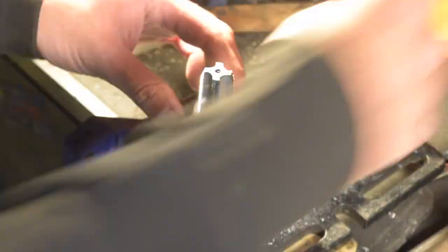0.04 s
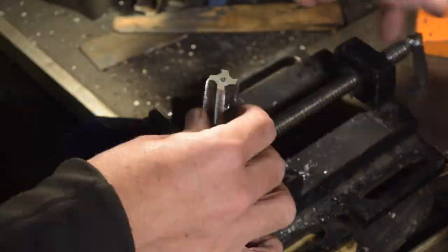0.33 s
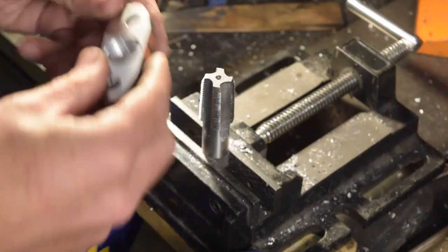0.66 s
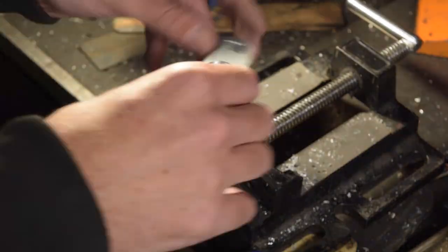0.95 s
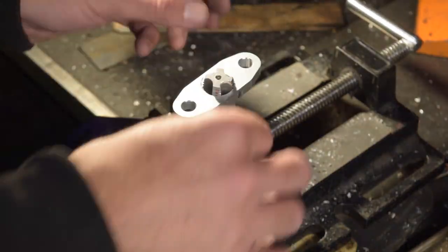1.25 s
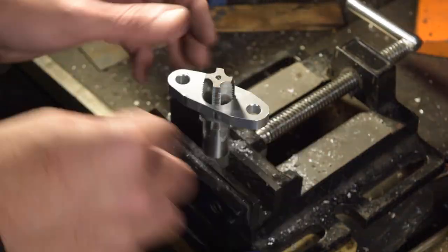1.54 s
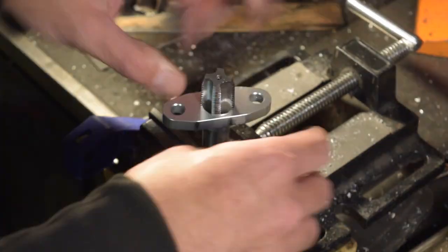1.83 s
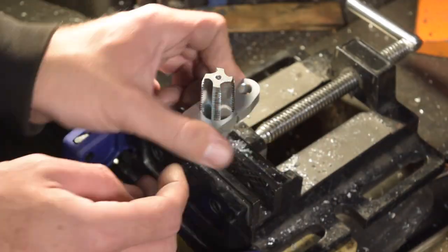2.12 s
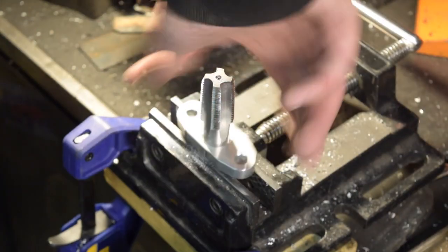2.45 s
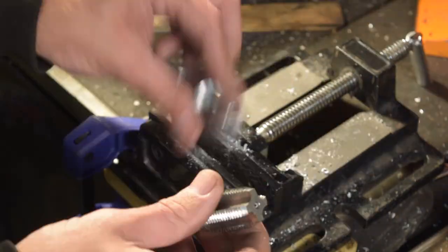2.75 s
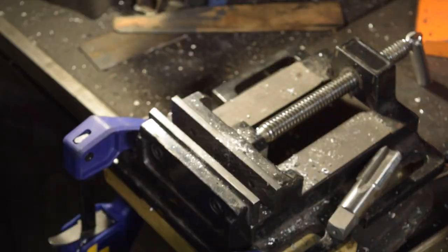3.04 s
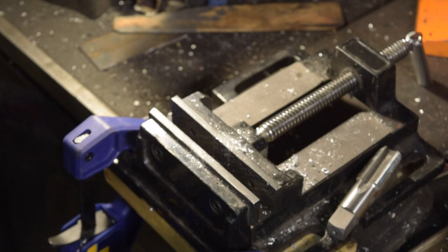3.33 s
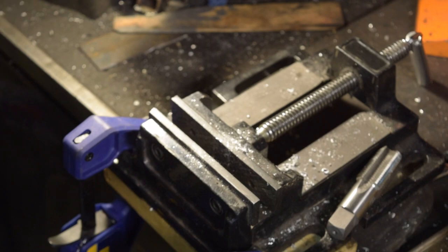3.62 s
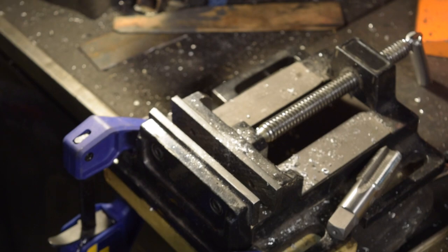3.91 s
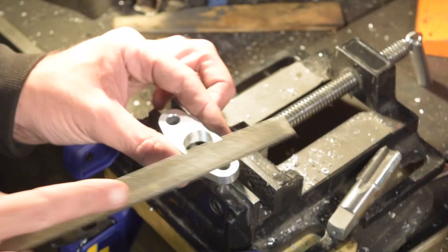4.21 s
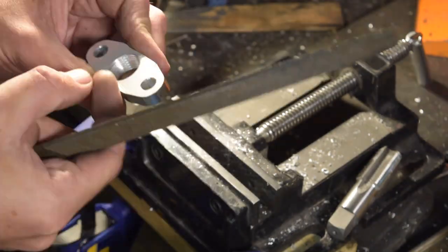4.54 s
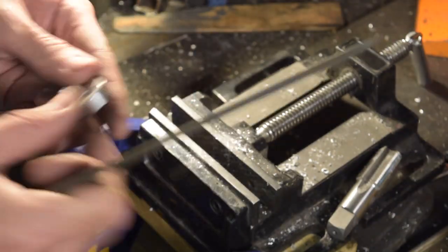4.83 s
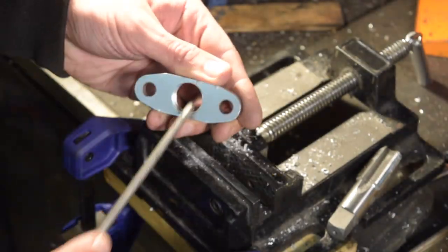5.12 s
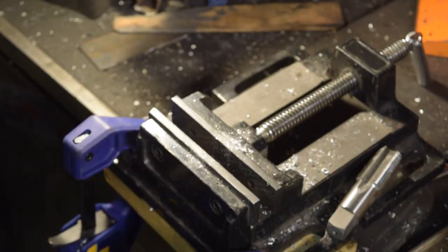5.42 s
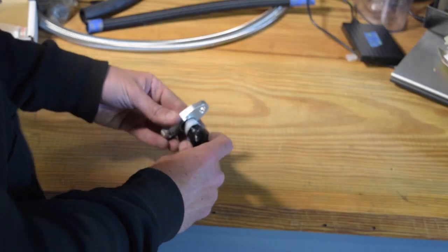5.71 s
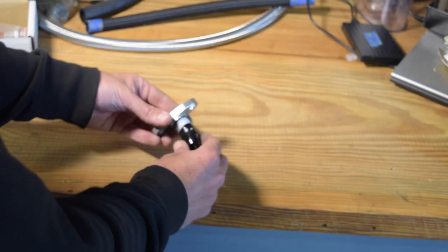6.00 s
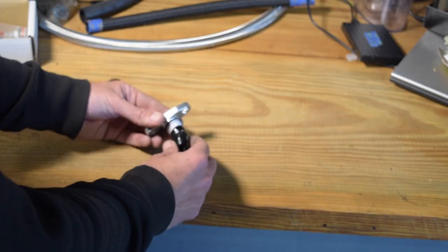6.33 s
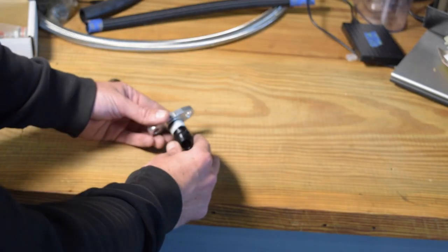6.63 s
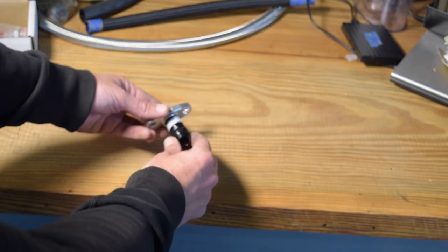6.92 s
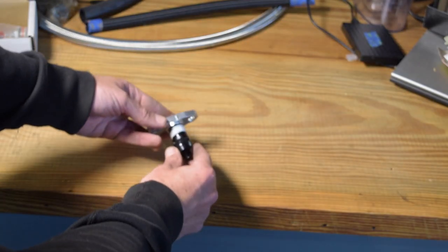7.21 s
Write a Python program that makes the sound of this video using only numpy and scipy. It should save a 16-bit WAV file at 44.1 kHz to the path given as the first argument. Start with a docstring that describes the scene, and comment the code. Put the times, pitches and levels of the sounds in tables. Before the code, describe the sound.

Sped-up metalwork sounds close and straight ahead in a quiet workshop, each contact very short and abruptly cut, over low room rumble and faint hiss. In the first second a vise gives a few dull metal knocks between light hand rubs. From 1 to about 2.5 seconds a metal flange clicks, rattles and scrapes around a threading tap, with thin, high pings, loudest near 1.3 seconds. More vise knocks follow, then a sharp steel clack at 2.8 seconds and two knocks by 3.1. In the lull a sleeve swishes softly, around 3.8 seconds. From 4.2 to 5 seconds a file gives several quick, ringing rasps. Tools clack at 5 seconds and bounce in a tiny clatter, followed by a light clink. From 5.8 to about 7.3 seconds come faint, separate scrapes of a fitting being twisted on.

```python
"""A metal flange is spun down a tap held in a vise, unclamped, filed and screwed to a pipe fitting.
The bench stands in a quiet workshop, close and straight ahead of the microphone. Each contact is a blow
and a chatter of slips that ring the touched metal; the work runs in time-lapse, so most sounds last a
few hundredths of a second and stop abruptly. A sleeve swishes once, over room rumble and faint hiss."""
import sys
import numpy as np
from scipy import signal
from scipy.fft import rfft, irfft
from scipy.io import wavfile

SR = 44100
rng = np.random.default_rng(int(sys.argv[2]) if len(sys.argv) > 2 else 0)


def dump_mix(stems):
    """Bounce the given channels to the path in sys.argv[1] as a 16-bit WAV at rate SR."""
    frames = np.atleast_2d(stems).T  # one column per channel
    limited = np.clip(frames, -1, 1)  # hard clip at full scale
    pcm = np.round(limited * 32767).astype(np.int16)
    wavfile.write(sys.argv[1], SR, pcm)


N = 320166
TIME = np.arange(N) / SR


def undb(db):
    """Decibels to gain."""
    return 10 ** (np.asarray(db) / 20)


def at_level(sound, db):
    """Scale to an rms level."""
    return sound * undb(db) / np.sqrt(np.mean(sound ** 2))


def colour_db(hz, colour):
    """Join (pitch_hz, level_db) points on a logarithmic frequency axis."""
    points_hz, points_db = np.transpose(colour)
    return np.interp(np.log(hz + 1), np.log(points_hz), points_db)


def noise(colour, db):
    """Steady noise of a given colour and rms level."""
    hz = np.arange(N // 2 + 1) * SR / N
    spectrum = rfft(rng.standard_normal(N)) * undb(colour_db(hz, colour))
    return at_level(irfft(spectrum, N), db)


def wander(rate_hz, count):
    """Random values at a steady rate, joined by straight lines."""
    return np.interp(TIME * rate_hz, np.arange(count), rng.standard_normal(count))


def ring(colour, modes, thud_db, edge_db, size, thud_hz=601, edge_hz=4510):
    """Impulse response of a part: a heavy push adds bass (thud), a sharp edge adds treble."""
    hz = np.arange(size // 2 + 1) * SR / size
    resonance = 1 + sum(undb(boost_db) ** 2 / (1 + (2 * (hz - pitch_hz) / width_hz) ** 2)
                        for pitch_hz, width_hz, boost_db in modes)
    bass_db = thud_db / (1 + (hz / thud_hz) ** 2)
    treble_db = edge_db * hz ** 3 / (hz ** 3 + edge_hz ** 3)
    magnitude = undb(colour_db(hz, colour) + bass_db + treble_db) * np.sqrt(resonance)
    cepstrum = irfft(np.log(magnitude))
    # folding the cepstrum puts all the ringing after the blow
    cepstrum[1:size // 2] *= 2
    cepstrum[size // 2 + 1:] = 0
    return irfft(np.exp(rfft(cepstrum)))


def contacts(rows, colour, modes, blow, grit_db, slip_hz, slip_db, stop_s, spot_db=2.5, size=8192):
    """Each contact is a first blow, then uneven slips over tiny ridges; its ring is cut short."""
    out, t = np.zeros(N + size), TIME[:size]
    for start, length, db, crest, fall_db, thud_db, edge_db in rows:
        ridges = rng.standard_normal(size) * undb(grit_db * rng.exponential(size=size))
        slips = undb(slip_db * np.interp(t * slip_hz, np.arange(size), rng.standard_normal(size)))
        # crest is a share of the length; fall_db is the drop over one whole length
        pressure = undb(-fall_db * np.abs(t / length - crest)) * (t < length)
        force = ridges * slips * pressure
        # a contact that starts under full pressure lands hard; one that swells lands softly
        force[0] += blow * pressure[0] * np.linalg.norm(force)
        # every contact touches another spot, which favours other modes
        favoured = [(hz, width, boost + spot_db * rng.standard_normal()) for hz, width, boost in modes]
        sound = signal.fftconvolve(force, ring(colour, favoured, thud_db, edge_db, size))[:size]
        sound *= np.exp(-np.maximum(t - length, 0) / stop_s)
        first = int(start * SR)
        out[first:first + size] += at_level(sound, db) * np.sqrt(length * SR / size)
    return out[:N]


def scrapes(table, fall_db, thud_db, edge_db, typical_db=-30):
    """Contact rows for a hand of even weight: a soft scrape is mostly thud, a hard one is sharper."""
    rows = []
    for start, length, db, crest in table:
        excess_db = db - typical_db
        thud, edge = thud_db - 0.54 * excess_db, edge_db + 0.06 * excess_db
        rows.append((start, length, db, crest, fall_db, thud, edge))
    return rows


def strokes(table, crest, fall_db, thud_db, edge_db):
    """Scrapes that all crest at the same share of their length."""
    return scrapes([(*row, crest) for row in table], fall_db, thud_db, edge_db)


def blows(table, crest, fall_db):
    """Contact rows that crest and fade alike, each with its own thud and edge."""
    return [(start, length, db, crest, fall_db, thud, edge) for start, length, db, thud, edge in table]


def workshop():
    """Room rumble sits in the middle; microphone hiss lies wide, opposite in the two channels."""
    # spectra of the room and the hiss: pitch_hz, level_db
    room_colour = [(15, -41), (25, -37), (43, -18), (111, -3.5), (166, -6.5), (200, -4), (384, -20.5),
                   (439, -18), (887, -28), (1700, -19), (1840, -20.5), (2550, -20), (14400, -24),
                   (16000, -23.5)]
    hiss_colour = [(15, -33), (25, 3), (217, -0.5), (277, 2), (363, -1.5), (4870, -4), (14800, -0.5),
                   (16000, -4)]
    rumble = noise(room_colour, db=-50.5) * undb(0.3 * wander(rate_hz=6.8, count=200))
    hiss = noise(hiss_colour, db=-58)
    return rumble + hiss * np.array([[1], [-1]])


def vise(shudder_s=0.04, shudder_db=-48.5):
    """The vise and its handle are worked; the bench shudders after each blow."""
    # blows on the vise: start_s, length_s, level_db, thud_db, edge_db
    hits = [(0.009, 0.042, -34, 14, -4), (0.168, 0.009, -35.5, -29, -2), (0.409, .028, -33.5, -9, -14),
            (0.565, 0.043, -28.5, -1, 2), (0.903, 0.02, -41.5, -10, -27), (2.62, 0.035, -34, 2, -1),
            (2.733, 0.026, -38.5, -1, 1), (2.758, .012, -23, -12, 21)]
    # broad spectrum of the vise: pitch_hz, level_db
    colour = [(90, -5), (180, 5.5), (400, -1.5), (900, -8.5), (1800, -9), (3200, -7), (5000, -24),
              (8000, -31.5), (15000, -46)]
    # its resonances: pitch_hz, width_hz, boost_db
    modes = [(1620, 60, 9), (2020, 70, 15), (2450, 100, 5), (3900, 110, 9), (7050, 110, 14),
             (10500, 140, 11)]
    shudders = [(start + length, shudder_s, shudder_db) for start, length, *_ in hits]
    rows = blows(hits, crest=0.1, fall_db=4)
    rows += strokes(shudders, crest=0.24, fall_db=15, thud_db=2, edge_db=15)
    return contacts(rows, colour, modes, blow=0.33, grit_db=2.5, slip_hz=344, slip_db=3.5, stop_s=0.0021)


def tools(bounce_from_s=5.147, gap_s=0.0058, touch_s=0.0047, settle_s=0.017, count=4):
    """Steel tools clack, bounce and give short knocks; one knock is the tap set down on the bench."""
    # blows of the tools: start_s, length_s, level_db, thud_db, edge_db
    clack_hits = [(0.226, .038, -29.5, 4, -4.5), (2.7885, 0.0038, -9.5, 2, 2.5),
                  (5.002, 0.0084, -20.5, 5, 14.5), (5.232, 0.0063, -32.5, 5, -10)]
    knock_hits = [(2.899, .0035, -11.5, -24, -14), (3.081, 0.01, -24.5, 7, 10.5),
                  (4.994, 0.0058, -20.5, 7, -8)]
    # broad spectra of the struck parts: pitch_hz, level_db
    clack_colour = [(90, -16), (180, -14), (400, -12.5), (900, -5), (1900, -7.5), (3100, 1.5), (5000, -5),
                    (8000, -19.5), (12000, -20), (15000, -28)]
    knock_colour = [(90, -10), (180, -6.5), (400, -3), (750, -2), (1800, -1), (3200, 6), (5000, -13.5),
                    (8000, -27), (15000, -37)]
    # their resonances: pitch_hz, width_hz, boost_db
    clack_modes = [(1450, 57, 3.5), (2080, 240, 10.2), (3200, 110, 3.5), (3470, 77, 7.3), (7350, 350, 8.1)]
    knock_modes = [(710, 190, 6.3), (1560, 200, 11), (2420, 210, 2.1)]
    bounces = [(bounce_from_s + k * gap_s, touch_s, -20) for k in range(count)]
    bounces.append((bounce_from_s + count * gap_s, settle_s, -36.5))
    clack_rows = blows(clack_hits, crest=0.25, fall_db=8)
    clack_rows += strokes(bounces, crest=0.25, fall_db=19, thud_db=-10, edge_db=-1)
    clacks = contacts(clack_rows, clack_colour, clack_modes,
                      blow=0.39, grit_db=1.1, slip_hz=684, slip_db=1, stop_s=0.00095)
    knocks = contacts(blows(knock_hits, crest=0.52, fall_db=12), knock_colour, knock_modes,
                      blow=0.3, grit_db=1, slip_hz=686, slip_db=6, stop_s=0.0007)
    return clacks + knocks


def hands(release_s=0.11, fall_db_per_s=285, twist_edge_db=5):
    """Hands slide over the parts, then twist the fitting on; every twist dies away alike."""
    # slides of the hands: start_s, length_s, level_db
    rubs = [(0.348, 0.051, -39.5), (0.482, 0.048, -44), (0.652, 0.039, -38), (0.8, 0.067, -45),
            (2.828, 0.08, -43.5), (4.022, .05, -47.5), (4.07, 0.048, -37.5), (4.136, 0.038, -40),
            (4.756, 0.035, -42)]
    # twists of the fitting: start_s, rise_s, level_db, thud_db
    twists = [(5.778, .006, -48, 7), (5.985, .018, -48.5, 5.5), (6.085, .005, -39, 3),
              (6.185, .024, -50, -16), (6.587, 0.01, -43.5, 11), (7.045, .038, -46.5, 3),
              (7.193, .017, -38.5, -1)]
    # broad spectrum of the handled parts: pitch_hz, level_db
    colour = [(90, -0.5), (180, 1.5), (400, 1), (900, -6.5), (1800, -5), (3200, -1), (5000, -10),
              (8000, -19), (15000, -30)]
    # their resonances: pitch_hz, width_hz, boost_db
    modes = [(543, 105, 6.8), (830, 340, 3.8), (3350, 120, 3.3)]
    rows = strokes(rubs, crest=0.4, fall_db=10, thud_db=-14.5, edge_db=-5.5)
    for start, rise, db, thud_db in twists:
        length = rise + release_s
        rows.append((start, length, db, rise / length, fall_db_per_s * length, thud_db, twist_edge_db))
    return contacts(rows, colour, modes, blow=0.26, grit_db=1.5, slip_hz=302, slip_db=2.5, stop_s=0.003)


def flange(spin_from_s=1.06, spin_to_s=2.02, nudge_s=0.06, nudge_count=16, click_s=0.005):
    """The flange drops on the flutes with a bright click and a rattle, and scrapes round the tap."""
    # drops against the flutes: start_s, length_s, level_db
    drops = [(0.998, 0.038, -22), (1.294, .036, -12), (1.420, 0.035, -22.5), (1.505, 0.039, -26),
             (1.585, 0.02, -29.5), (1.625, 0.01, -19.5), (1.773, 0.033, -20.5)]
    # turns on the tap: start_s, length_s, level_db, crest_share
    turns = [(1.118, 0.043, -32, .25), (1.166, 0.042, -30, 0.44), (1.252, 0.04, -19.5, 0.61),
             (1.342, 0.064, -32, 0.18), (1.455, 0.047, -26, .25), (1.705, 0.018, -32.5, 0.84),
             (1.811, 0.027, -19.5, 0.81), (1.895, 0.025, -37, 0.25), (1.926, 0.051, -33.5, 0.29),
             (2.094, 0.024, -39.5, 0.19), (2.14, 0.041, -44, 0.35), (2.272, 0.046, -40.5, 0.54),
             (2.397, .046, -34, 0.57), (2.49, .085, -35, 0.51)]
    # broad spectrum of the flange: pitch_hz, level_db
    colour = [(90, -3), (180, 3.5), (380, -4), (660, 0.5), (850, -3.5), (1800, -0.5), (2500, 0),
              (3200, 1.5), (5000, -16.5), (8000, -20.5), (15000, -34.5)]
    # its resonances: pitch_hz, width_hz, boost_db
    modes = [(225, 60, 6), (1030, 50, 8), (1250, 48, 20), (1995, 60, 10), (2820, 40, 4), (3385, 90, 12),
             (5730, 120, 7), (7790, 70, 17), (8370, 60, 10), (10945, 40, 22), (13000, 80, 17)]
    # fingers keep nudging it round, unevenly and more and more lightly
    time_scatter, level_scatter = rng.standard_normal((nudge_count, 2)).T
    starts_s = np.linspace(spin_from_s, spin_to_s - nudge_s, nudge_count) + 0.006 * time_scatter
    levels_db = np.linspace(-41, -45.5, nudge_count) + 2.5 * level_scatter
    nudges = [(start, nudge_s, db) for start, db in zip(starts_s, levels_db)]
    clicks = [(start, click_s, db - 2) for start, _, db in drops]
    rows = strokes(clicks, crest=0.33, fall_db=-1, thud_db=-7, edge_db=8.5)
    rows += strokes(drops, crest=0.2, fall_db=9.5, thud_db=-3, edge_db=-1)
    rows += scrapes(turns, fall_db=14, thud_db=-1, edge_db=-4)
    rows += strokes(nudges, crest=0.59, fall_db=10, thud_db=3, edge_db=-7)
    return contacts(rows, colour, modes,
                    blow=0.28, grit_db=2, slip_hz=344, slip_db=2.5, stop_s=0.0089, spot_db=3)


def flange_pings(stop_s=0.001):
    """The flange rings on in its thin, high modes when the fingers let go."""
    # high modes of the flange: mode_name -> pitch_hz
    mode_hz = {"lower": 7780, "upper": 10910, "top": 13000}
    # free rings: start_s, length_s, mode_name, level_db, t60_s
    pings = [(0.999, .034, "lower", -28, 0.085), (1.29, 0.053, "upper", -33, 0.36),
             (1.293, 0.018, "top", -30, .04), (1.482, 0.024, "lower", -42, 0.12),
             (1.626, 0.065, "upper", -20, 0.084), (1.776, .031, "upper", -24, 0.069),
             (2.53, 0.049, "lower", -27.5, 0.21), (2.55, 0.0165, "upper", -35, .15)]
    out = np.zeros(N)
    for start, length, mode, db, t60 in pings:
        t, first = TIME[:int(length * SR)], int(start * SR)
        decay = np.exp(-np.log(1000) * t / t60)
        cutoff = np.minimum((length - t) / stop_s, 1)
        out[first:first + len(t)] += undb(db) * decay * cutoff * np.sin(2 * np.pi * mode_hz[mode] * t)
    return out


def sleeve():
    """A sleeve swishes as the arm comes back, fluttering with its folds."""
    # swell of the swish: time_s, level_db
    swell = [(3.5, -54.5), (3.66, -51.5), (3.76, -47), (3.84, -47), (3.96, -51.5), (4.08, -55)]
    # spectrum of the cloth: pitch_hz, level_db
    colour = [(80, 0), (230, 3), (450, -1.5), (900, -3.5), (1400, -10), (4000, -18), (12000, -48.5)]
    cloth = noise(colour, db=0)
    swell_db = np.interp(TIME, *np.transpose(swell))
    flutter_db = 1.06 * wander(rate_hz=36, count=400)
    return cloth * undb(swell_db + flutter_db)


def glides(table, thud_db, edge_db, glide_s=0.035, softer_db=17.5):
    """Rows for a soft swell that leads into each contact, as when a file glides on before it bites."""
    lead_ins = [(start - glide_s, glide_s, db - softer_db) for start, _, db, _ in table]
    return strokes(lead_ins, crest=1, fall_db=5, thud_db=thud_db, edge_db=edge_db)


def files():
    """Files rasp the face, bite the rim and scrape the bore; later the flange gives one short clink."""
    # a file's rasp on the face, then the flange's clink: start_s, length_s, level_db, crest_share
    rasp_and_clink = [(4.224, 0.1, -25.5, 0.21), (5.318, 0.027, -37, 0.47)]
    # file strokes on rim and bore: start_s, length_s, level_db, crest_share
    rim_strokes = [(4.408, 0.039, -19.5, 0.24), (4.468, 0.017, -28, 0.28), (4.486, 0.038, -19.5, 0.51),
                   (4.52, .021, -20.5, 0.44)]
    bore_strokes = [(4.951, .046, -30, 0.82)]
    # broad spectrum of each surface: pitch_hz, level_db
    face_colour = [(90, -7), (180, -5.5), (400, 3), (900, 1.5), (1800, -2), (3200, 1), (5000, -8),
                   (8000, -17.5), (15000, -26)]
    rim_colour = [(90, 2), (180, 16), (400, 10), (900, 8.5), (1800, 2), (3200, 9.5), (5000, -3), (8000, -9),
                  (15000, -11.5)]
    bore_colour = [(90, -1), (180, 5), (400, 4.5), (900, -0.5), (1800, 2), (3200, -10), (5000, -11.5),
                   (8000, -25), (15000, -23.5)]
    # their resonances: pitch_hz, width_hz, boost_db
    face_modes = [(350, 50, 7), (1010, 90, 6), (1350, 50, 13), (3030, 40, 6), (3410, 50, 13),
                  (3890, 80, 11), (5820, 50, 10), (6360, 120, 9), (8230, 70, 13), (10600, 50, 13)]
    rim_modes = [(992, 30, 5.3), (1696, 50, 13), (1930, 88, 16.6), (2970, 650, 5.8), (7300, 110, 2.7),
                 (9100, 260, 5.8)]
    bore_modes = [(660, 36, 18), (3080, 52, 22.4), (4500, 70, 11), (8700, 40, 26), (12700, 28, 12)]
    face_rows = scrapes(rasp_and_clink, fall_db=22.5, thud_db=4.5, edge_db=5)
    face_rows += glides(rasp_and_clink, thud_db=-6, edge_db=1)
    face = contacts(face_rows, face_colour, face_modes,
                    blow=0.22, grit_db=2.5, slip_hz=506, slip_db=3, stop_s=0.0032)
    rim_rows = scrapes(rim_strokes, fall_db=10, thud_db=-0.5, edge_db=0)
    rim_rows += glides(rim_strokes, thud_db=10, edge_db=5)
    rim = contacts(rim_rows, rim_colour, rim_modes,
                   blow=0.22, grit_db=1.2, slip_hz=570, slip_db=1.5, stop_s=0.0024)
    bore_rows = scrapes(bore_strokes, fall_db=13, thud_db=-1, edge_db=3.5)
    bore = contacts(bore_rows, bore_colour, bore_modes,
                    blow=0.1, grit_db=1.5, slip_hz=417, slip_db=2.5, stop_s=0.003)
    return face + rim + bore


def scene():
    """All the work happens straight ahead of the microphone, with the workshop behind it."""
    work = flange() + vise() + tools() + files() + hands()
    # small parts radiate little deep bass
    low_cut = signal.butter(1, 65, "high", fs=SR, output="sos")
    return signal.sosfilt(low_cut, work) + flange_pings() + sleeve() + workshop()


def record(dry):
    """The recorder rounds the loudest peaks and cuts the top treble."""
    ceiling, top_hz = 0.8, 15800
    rounded = ceiling * np.tanh(dry / ceiling)
    high_cut = signal.ellip(8, 0.2, 70, top_hz, fs=SR, output="sos")
    return signal.sosfilt(high_cut, rounded)


dry = scene()
out = record(dry)
dump_mix(out)
```